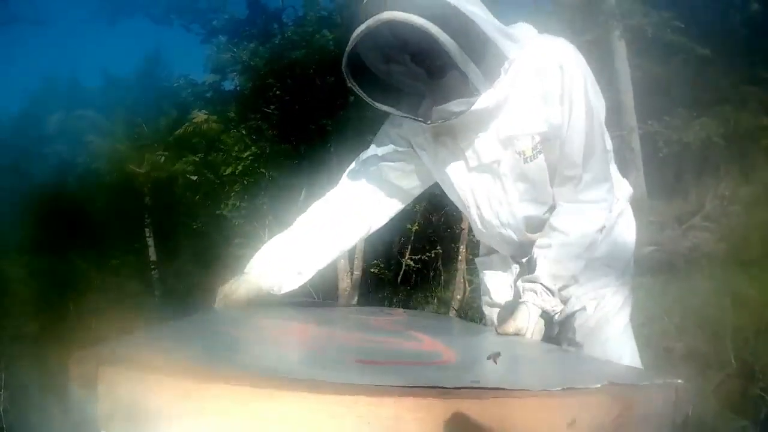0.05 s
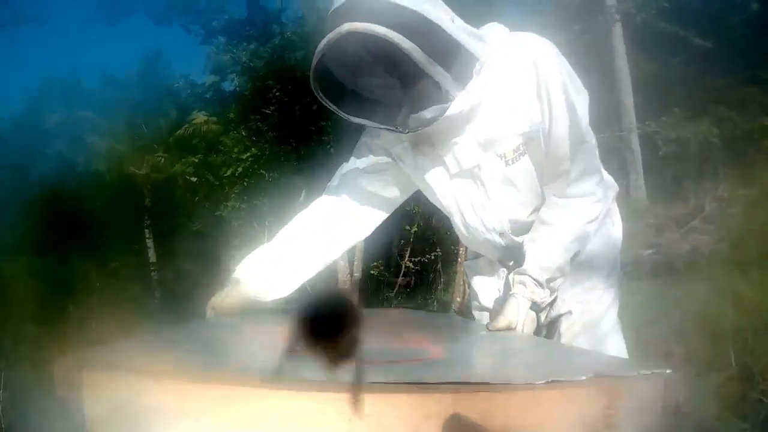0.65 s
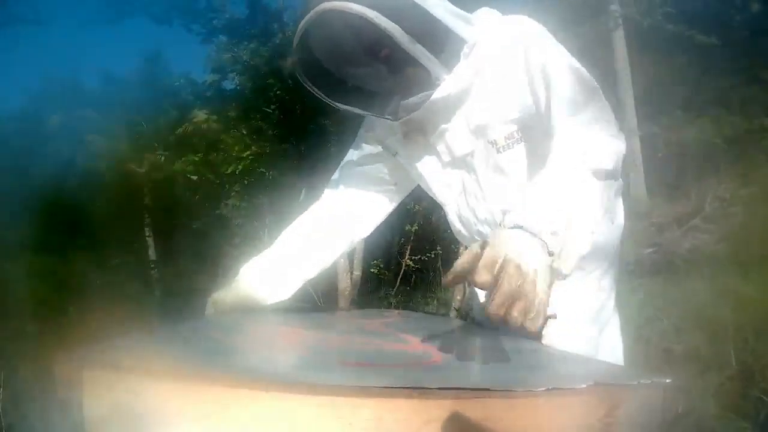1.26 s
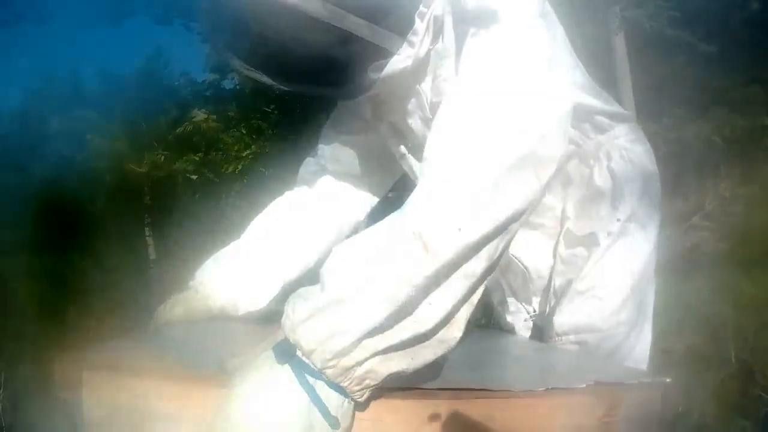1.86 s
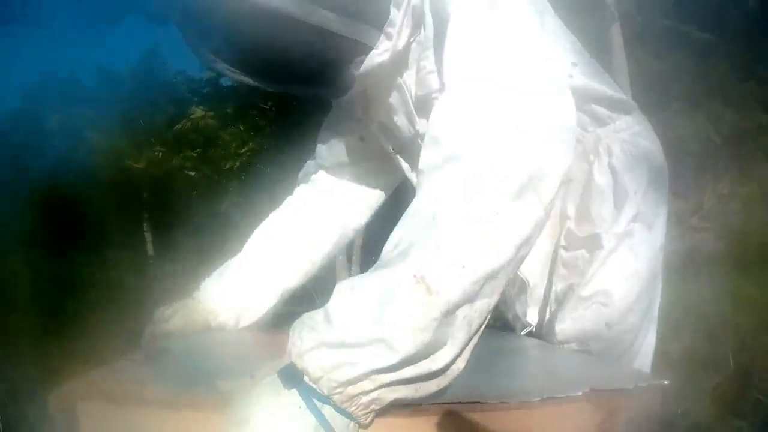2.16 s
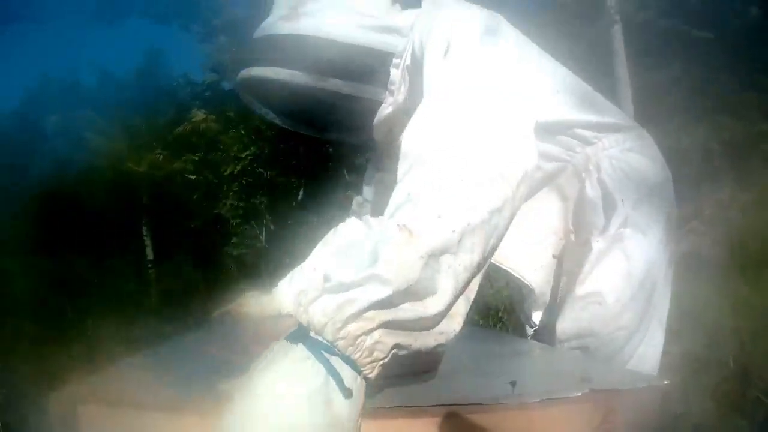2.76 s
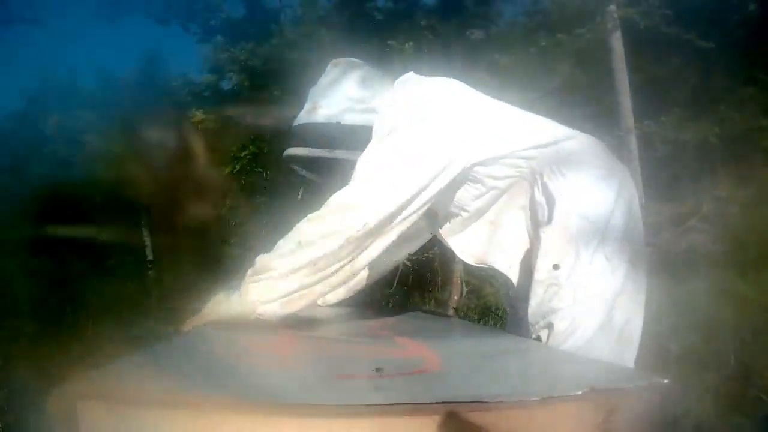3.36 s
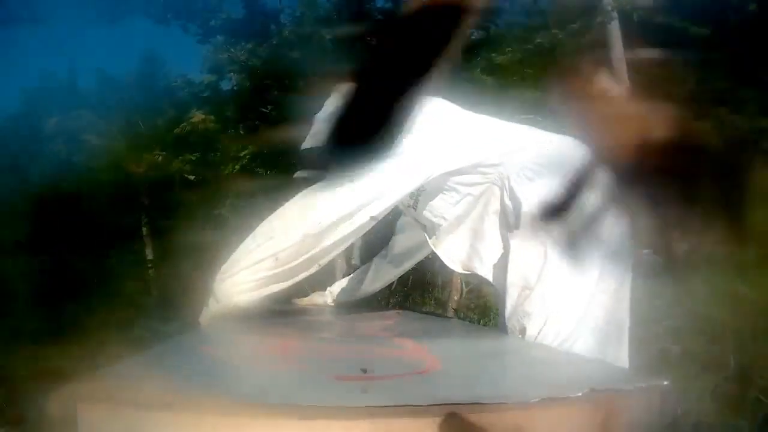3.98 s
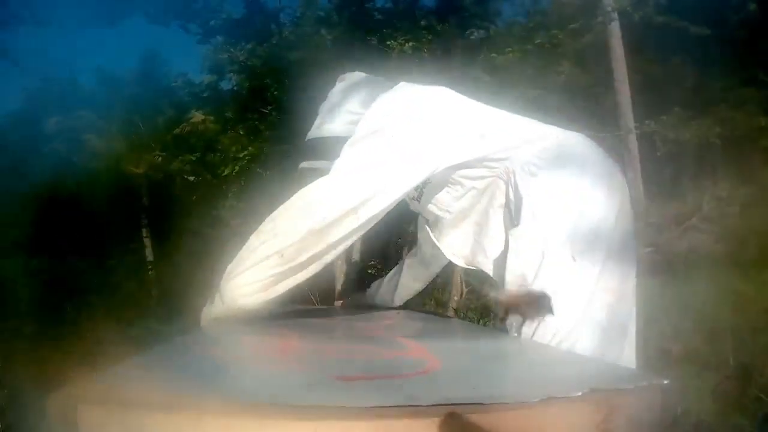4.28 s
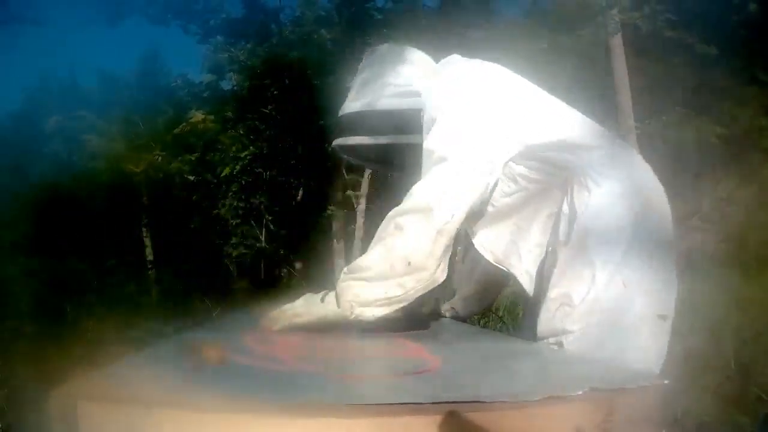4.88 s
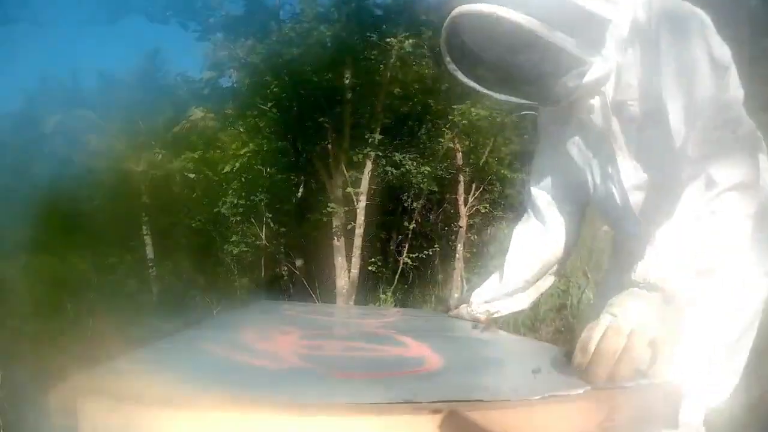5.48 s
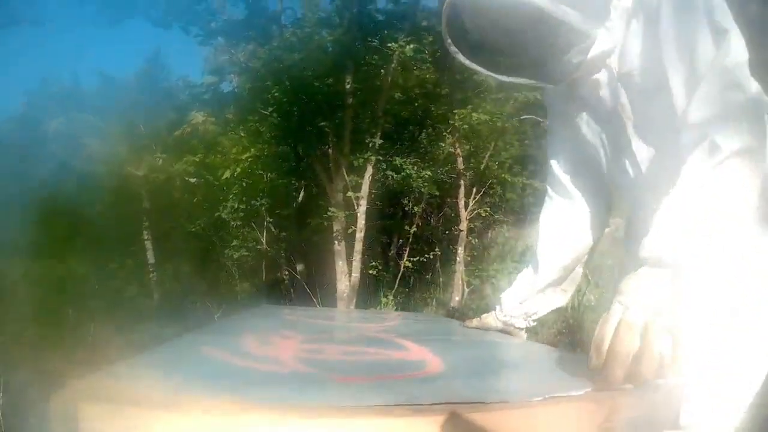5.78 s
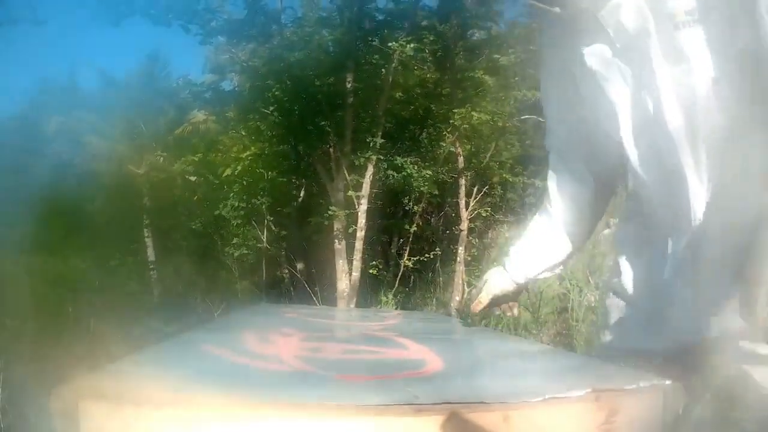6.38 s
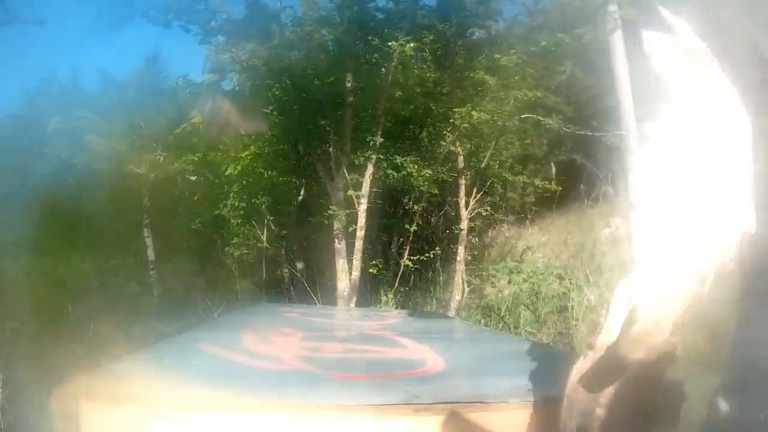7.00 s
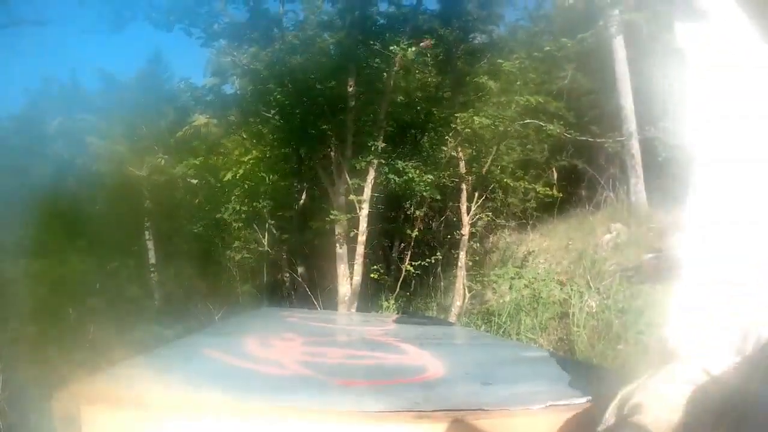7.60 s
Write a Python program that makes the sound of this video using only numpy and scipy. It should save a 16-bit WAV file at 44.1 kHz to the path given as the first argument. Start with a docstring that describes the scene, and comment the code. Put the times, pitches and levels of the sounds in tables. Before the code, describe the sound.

Honeybees drone steadily outdoors, and one after another they buzz quickly past a microphone standing on their wooden hive. Gloves rub the metal-covered lid and give it dull, rattling knocks. About two seconds in, the lid is bumped hard and shoved into place with a short juddering scrape. Close fly-bys then take over, with softer rubbing, a sharp click and a few light bumps. Everything sounds muffled.

```python
"""Gloves and sleeves rub and bump the metal-covered lid of a wooden hive, over a drone of honeybees.
The lid judders once as the beekeeper shoves it into place, ringing the box in stick-slip jerks.
Bee after bee swoops past a small camera standing on the box, each buzz a stack of wingbeat harmonics.
Every layer has the muffled tone of the camera's housing; the camera overloads on the shove and adds
a faint fizz."""
import sys
import numpy as np
from scipy import signal
from scipy.fft import rfft, irfft, next_fast_len
from scipy.io import wavfile
from scipy.ndimage import map_coordinates

SR = 44100
rng = np.random.default_rng(int(sys.argv[2]) if len(sys.argv) > 2 else 0)


def store_pcm(level_fs):
    """Save levels as 16-bit WAV."""
    pcm = np.round(np.clip(level_fs, -1, 1) * 32767).astype(np.int16)
    wavfile.write(sys.argv[1], SR, np.atleast_2d(pcm).T)


N = 341685
TIME = np.arange(N) / SR

# Levels in the tables are relative: each layer sets its own overall gain.
# open-air bed: (frequency [Hz], noise density [dB])
AIR_TONE = [(30, 5.5), (200, -3.5), (400, -1.5), (780, 2), (1100, -10.5), (2000, -27.5), (3500, -45),
            (6000, -38), (15000, -72)]
# the circling swarm: (time [s], mean wingbeat [Hz], level [dB])
SWARM_PATH = [(0, 273.6, -39.5), (.8, 275.5, -38), (1.2, 277.9, -40), (1.7, 286.3, -34.5),
              (2.4, 277.3, -32), (3, 276.7, -36), (3.6, 275.3, -33.5), (4.2, 268.3, -32),
              (4.75, 261.8, -40), (5.2, 262.5, -38), (5.8, 262.2, -37.5), (6.4, 261.1, -41),
              (6.85, 268.2, -44.5), (7.2, 271.2, -36.5), (7.75, 270.4, -39)]
# colour of the swarm: (frequency [Hz], level [dB])
SWARM_TONE = [(220, 0.5), (290, -6.5), (560, -1.5), (820, -8.5), (1000, -20), (1500, -25.5), (2300, -36.5),
              (3800, -47.5)]
# one bee's thin, high buzz: (time [s], wingbeat [Hz], level [dB])
WHINE_PATH = [(6.5, 430.4, -83), (6.7, 427, -53), (7.1, 426.1, -47), (7.4, 420.6, -44),
              (7.75, 427.1, -46.5)]
# gloved hands on the lid: (start [s], length [s], rubbing level [dB], rocking level [dB])
HAND_MOVES = [(0.035, 0.1, -35.5, -29), (0.208, 0.32, -34, -30.5), (0.556, .16, -32.5, -29.5),
              (1.258, .36, -46.5, -34.5), (2.3, 0.19, -40.5, -35.5), (2.595, 0.18, -54, -42.5),
              (3.273, 0.35, -52, -41), (3.917, .35, -50, -42.5), (4.526, 0.038, -49, -35),
              (4.903, 0.12, -48, -32.5), (5.016, 0.1, -35.5, -36), (5.214, .13, -38.5, -37.5),
              (5.364, 0.1, -40, -29), (5.508, 0.038, -29, -32.5), (5.616, 0.059, -26.5, -31.5),
              (5.748, 0.14, -55, -41.5), (6.965, 0.11, -36.5, -32.5), (7.186, 0.14, -47.5, -33.5),
              (7.355, 0.18, -36, -32), (7.679, .07, -33.5, -38.5)]
# rumble of the rocking box: (frequency [Hz], noise density [dB])
RUMBLE_TONE = [(18, 0.5), (45, 3.5), (62, -3.5), (85, 0), (120, -8), (165, -9.5), (230, -15), (400, -70.5)]
# leather and cloth on the lid: (frequency [Hz], noise density [dB])
RUB_TONE = [(71, -32.5), (120, 2), (147, -7.5), (238, -12.5), (274, -4), (358, -7.5), (399, -5), (474, -8),
            (528, -4), (647, -8.5), (769, 0), (971, -19.5), (5000, -61), (6500, -88.5), (11000, -120)]
# clicks, scuffs and squeaks: (time [s], level [dB], centre [Hz], bandwidth [Hz], 60 dB decay [s])
TICKS = [(0.314, -48.5, 1800, 1800, 0.048), (.565, -47.5, 2140, 400, .05), (1.253, -50, 1500, 1210, 0.42),
         (3.426, -63, 3983, 1998, 0.15), (3.909, -55.5, 2948, 2500, 0.092), (5.259, -27, 1850, 710, 0.025),
         (5.26, -47.5, 5550, 2400, 0.022), (5.269, -42.5, 1970, 1400, 0.13), (5.29, -51.5, 2750, 300, 0.13),
         (5.271, -58.5, 5500, 2400, 0.14), (5.29, -32.5, 1120, 220, 0.16),
         (5.642, -45.5, 3000, 2500, 0.011), (6.984, -43, 1300, 1200, 0.056), (7.484, -52, 3750, 250, 0.089),
         (7.494, -54, 4330, 250, 0.08)]
# resonances of box and lid: (frequency [Hz], bandwidth [Hz], level [dB])
BOX_MODES = [(83.5, 55, -11), (152.4, 9.5, -7), (254, 50, -3), (333.6, 50, 4), (404, 28, 3.5),
             (454.6, 21.7, 6), (568, 18, 2), (646, 20, 3), (695.6, 29, 1), (716, 12.5, 5.5), (753, 17, 0.5),
             (830, 100, -20), (1120, 97, -27), (1530, 44, -20), (1770, 200, -26), (2430, 300, -40)]
# dead thud of the boards: (frequency [Hz], level [dB])
THUD_TONE = [(20, 1.5), (60, 6), (400, 5), (780, 6), (1000, -0.5), (1500, -15), (2500, -39.5),
             (3800, -50.5), (8000, -58)]
# slow bending of the boards: (frequency [Hz], level [dB], 60 dB decay [s])
FLEX_MODES = [(84.3, -2.5, 0.31), (115, -1.5, 0.26), (160, 0, .14), (228.7, 0.5, 0.15), (316, -5, 0.16)]
# colour of a padded blow: (frequency [Hz], level [dB])
GLOVE_TONE = [(30, -14.5), (200, 4.5), (500, -0.5), (720, 2), (1000, 4), (1600, -4.5), (2500, 2.5),
              (3200, -13), (8000, -33.5)]
# blows on the box, and a soft thump at 4.184 s as a bee swoops close: (time [s], level [dB], thump offset [dB],
# 20 dB rattle decay [s])
KNOCKS = [(0.209, -17, -22, 0.026), (0.314, -34, 8.5, 0.025), (0.387, -14.5, -16, 0.13),
          (0.718, -10, -0.5, 0.046), (0.726, -4, -5, 0.065), (0.751, -11.5, -5.5, 0.086),
          (0.81, -21, 2, 0.094), (1.254, -14, -3, 0.059), (1.286, -21.5, 0, 0.2),
          (1.565, -23.5, -1.5, 0.061), (1.855, -7.5, -2.5, 0.089), (1.906, -1, -2.5, 0.057),
          (2.194, -6, -9.5, 0.077), (2.423, -21.5, -10, 0.058), (4.184, -29.5, 7, 0.036),
          (5.536, -17.5, -16.5, 0.023), (5.619, -27, 8.5, .04), (5.644, -27, 3, 0.085),
          (6.517, -27.5, -17, 0.034), (6.984, -28, -1.5, 0.043)]
# steady push on the lid: (time [s], force [dB])
PUSH_FORCE = [(1.88, -24.5), (1.92, -12), (2.08, -12), (2.26, -21), (2.38, -42)]
# the lid breaks loose in jerks: (time [s], force above the steady push [dB])
JERKS = [(1.961, 7.5), (2.026, 8.5), (2.058, 9), (2.104, 10.5), (2.154, 7.5)]
# grit under the lid: (frequency [Hz], noise density [dB])
GRIT_TONE = [(300, -31), (1300, -3), (1900, 2.5), (2700, 3), (3900, -18), (5500, -7.5), (7000, -9.5),
             (9000, -27.5), (15000, -36.5)]
# wing wash on the microphone: (time [s], level [dB], width [s])
WING_WASH = (4.208, -15, 0.0092)
# colour of a close bee: (frequency [Hz], level [dB])
CLOSE_BEE_TONE = [(220, 2), (290, -4), (560, 1), (750, -8.5), (830, -14.5), (1000, -12), (1350, -27.5),
                  (1600, -30), (1950, -37.5), (2500, -45.5), (3600, -66)]
# fly-bys: (closest at [s], level [dB], wingbeat [Hz], steepest glide [Hz/s], half length [s],
# fundamental offset from the bee's heading [dB])
FLYBYS = [(1.05, -44, 250, -150, .07, 5), (1.532, -36, 295.6, -1, .09, -13),
          (1.731, -33.5, 278.5, -61, 0.0692, -11.5), (2.338, -31, 287.8, 40, 0.0487, -1.5),
          (2.559, -34.5, 271.6, 60, 0.0713, -3.5), (2.841, -41.5, 279.5, 2, .05, 0.5),
          (3.131, -35.5, 294.4, 0.5, 0.041, 0.5), (3.36, -35.5, 284.8, 0, 0.08, 1.5),
          (3.674, -38.5, 296, 61, 0.06076, -2.5), (3.89, -34, 279, -100, 0.0303, 4.5),
          (3.929, -33, 253.2, 98.5, .03, 1), (4.01, -28, 270.6, -230, .045, 4),
          (4.101, -30, 243.2, -180, .04, 0.5), (4.186, -21, 285.7, 329.5, .022, -0.5),
          (4.281, -37.5, 273.6, -100, .05, 4), (4.49, -28, 245, 99.5, .028, 0),
          (4.574, -27, 271.7, -40, 0.0605, 3), (5.05, -38, 258.3, -1, 0.023, -2),
          (5.22, -34.5, 273.5, -0.5, .04, 2.5), (5.3, -43.5, 258, -200, .03, 1),
          (5.361, -32, 238.5, -39.5, 0.0497, 0.5), (5.56, -30, 252, 60, 0.0304, -8),
          (5.68, -22, 241.1, -330, .022, -5.5), (5.77, -28, 238.8, 129.5, .04, -2.5),
          (5.864, -36, 233.6, -130, 0.022, 2.5), (6.085, -30.5, 242, -210, .04, 0),
          (6.23, -33, 251.6, -130, 0.046, -4.5), (6.329, -33.5, 239.2, -180, .04, -5.5),
          (6.702, -46, 246, 60, 0.1187, 2.5), (7.172, -38.5, 253.7, 1.5, 0.038, 3),
          (7.432, -37, 285.3, -2.5, 0.054, 0)]


def amp(db):
    """Decibels to gain."""
    return 10 ** (np.asarray(db) / 20)


def unit(x):
    """Scale to rms 1."""
    return x / np.sqrt(np.mean(x ** 2) + 1e-20)


def eq_gain(tone, hz):
    """Gain of an EQ curve at hz, read on a log frequency axis."""
    freqs, db = np.transpose(tone)
    return amp(np.interp(np.log(hz + 1), np.log(freqs + 1), db))


def automation(rows):
    """One value per sample for each column after the time."""
    times, *columns = np.transpose(rows)
    return [np.interp(TIME, times, column) for column in columns]


def gate(rows, fade_s=0.069):
    """1 within the time span of the rows, fading to 0 outside."""
    return np.clip(1 + np.minimum(TIME - rows[0][0], rows[-1][0] - TIME) / fade_s, 0, 1)


def wobble(rate, size=N):
    """Smooth random modulation, rate knots a second."""
    t = TIME[:size]
    knots = rng.standard_normal(int(size * rate / SR) + 5)
    coarse = map_coordinates(knots, [1 + t[::32] * rate], mode="nearest")
    return np.interp(t, t[::32], coarse)


def filtered(x, response):
    """Shape x by a function of frequency."""
    size = next_fast_len(N + SR // 2)
    return irfft(rfft(x, size) * response(np.fft.rfftfreq(size, 1 / SR)), size)[:N]


def noise(tone):
    """Coloured noise of rms 1."""
    return unit(filtered(rng.standard_normal(N), lambda hz: eq_gain(tone, hz)))


def impulse(tone, size=4096):
    """The tightest (minimum-phase) impulse response with this colour, energy 1."""
    cepstrum = irfft(np.log(eq_gain(tone, np.fft.rfftfreq(size, 1 / SR))))
    cepstrum[1:size // 2] *= 2
    cepstrum[size // 2 + 1:] = 0
    response = irfft(np.exp(rfft(cepstrum)))
    return response / np.linalg.norm(response)


def slips(rate, spread_db):
    """Tiny stick-slip impulses of uneven size, about rate a second, rms 1."""
    clicks = (rng.random(N) < rate / SR) * rng.choice([-1, 1], N)
    return unit(clicks * amp(spread_db * rng.standard_normal(N)))


def open_air(level_db=-42.5, drift_db=2.07):
    """A soft bed of outdoor noise that drifts in level."""
    return amp(level_db + drift_db * wobble(3.165)) * noise(AIR_TONE)


def swarm(spread=.05, swerve=.04, jitter=0.007925, passing_db=3, bees=12):
    """The drone: each bee has its own wingbeat, swerves in pitch and swells as it passes."""
    mean_hz, db = automation(SWARM_PATH)
    drone = np.zeros(N)
    for offset in np.linspace(-1, 1, bees):
        beat_hz = mean_hz * (1 + spread * offset + swerve * wobble(7) + jitter * wobble(50))
        cycles = np.cumsum(beat_hz) / SR + rng.random()
        drone += amp(passing_db * wobble(6)) * (cycles % 1 - .5)  # one sharp stroke per beat
    # the factor hz flattens the sawtooth's slope ahead of the EQ
    drone = filtered(drone, lambda hz: hz * eq_gain(SWARM_TONE, hz) * (hz > 150) / (1 + (hz / 4000) ** 8))
    return amp(db) * unit(drone)


def wings(hz, tone, turn_db, turn_rate, hum_db=0, rasp_db=0, rasp_hz=1150, harmonics=12):
    """Wingbeat harmonics, voiced relative to the second; each swells and fades as the bee turns."""
    size = len(hz)
    t, buzz = TIME[:size], np.zeros(size)
    phase = 2 * np.pi * np.cumsum(hz) / SR
    beat_hz, shelf_db = hz[::64], np.broadcast_to(rasp_db, size)[::64]
    for k in range(1, harmonics + 1):
        db = turn_db * wobble(turn_rate, size)[::64] + hum_db * (k == 1)
        db += shelf_db / (1 + (rasp_hz / (k * beat_hz)) ** 8)  # rasp is a high shelf
        gain = amp(db) * eq_gain(tone, k * beat_hz) / eq_gain(tone, 2 * beat_hz)
        buzz += np.interp(t, t[::64], gain) * np.sin(k * phase + 2 * np.pi * rng.random())
    return np.sqrt(2) * buzz


def whining_bee(trim_db=-3.5, jitter=0.00634):
    """One bee beats its wings faster, a thin buzz above the swarm."""
    hz, db = automation(WHINE_PATH)
    tone = [(420, -6.5), (850, -9), (1300, -23.5)]  # (frequency [Hz], level [dB])
    buzz = wings(hz * (1 + jitter * wobble(25)), tone, turn_db=0.5, turn_rate=14, harmonics=3)
    return gate(WHINE_PATH) * amp(db + trim_db) * buzz


def hand_press(start, length, release_s, attack_s=0.017):
    """Envelope of a hand that presses down, holds and lets go."""
    attack = np.clip((TIME - start) / attack_s, 0, 1)
    return attack * np.exp(-np.maximum(TIME - start - length, 0) / release_s)


def lid_force(jerk_width_s=0.0098):
    """Force on the sliding lid: a steady push that surges at every jerk."""
    surges_db = sum(db * np.exp(-((TIME - at) / jerk_width_s) ** 2 / 2) for at, db in JERKS)
    return gate(PUSH_FORCE) * amp(automation(PUSH_FORCE)[0] + surges_db)


def box_rocking(level_db=0.5, shove_db=-7, resting_db=-47.5, sway_db=2):
    """Low rumble: the box shifts under the hands and the shove, and shakes the camera."""
    moves = [amp(db) * hand_press(at, length, release_s=.06) for at, length, _, db in HAND_MOVES]
    weight = np.max(moves, axis=0)
    shaking = np.sqrt(weight ** 2 + (amp(shove_db) * lid_force()) ** 2 + amp(resting_db) ** 2)
    return amp(level_db + sway_db * wobble(18)) * shaking * noise(RUMBLE_TONE)


def ticks():
    """Brief bright contacts, each a burst of noise in one resonance."""
    track, t = np.zeros(N + SR), np.arange(SR // 4) / SR
    hz = np.fft.rfftfreq(len(t), 1 / SR)
    for at, db, centre, width, t60 in TICKS:
        resonance = 1 / (1 + (2 * (hz - centre) / width) ** 2)
        burst = irfft(rfft(rng.standard_normal(len(t))) * resonance, len(t))
        rise = 1 - np.exp(-t * width)  # a narrow resonance builds slowly
        track[round(at * SR):][:len(t)] += amp(db - 60 * t / t60) * rise * unit(burst)
    return track[:N]


def glove_rubbing(level_db=0.5, catch_db=2.5):
    """Leather and cloth catch and slip on the lid."""
    grain = unit(signal.fftconvolve(slips(1300, spread_db=3.5), impulse(RUB_TONE))[:N])
    moves = [amp(db) * hand_press(at, length, release_s=0.065) for at, length, db, _ in HAND_MOVES]
    return amp(level_db + catch_db * wobble(30)) * np.max(moves, axis=0) * grain


def box_body(force, thud_db=-3):
    """A force rings the box's modes on top of the dead thud of the boards."""
    t = np.arange(SR // 2) / SR
    ring = sum((-1) ** k * amp(db) * width * np.exp(-np.pi * width * t) * np.sin(2 * np.pi * hz * t)
               for k, (hz, width, db) in enumerate(BOX_MODES))
    body = ring / np.linalg.norm(ring)
    thud = impulse(THUD_TONE)
    body[:len(thud)] += amp(thud_db) * thud
    return signal.fftconvolve(force, body / np.linalg.norm(body))[:N]


def glove_knocks(body_db=10, rattle_db=-17, flex_db=-5, flex_attack_s=0.00053):
    """Each padded blow bends the boards, and the loose lid rattles after it."""
    force, bending = np.zeros(N), np.zeros(N)
    chatter = slips(900, spread_db=1.5)
    t = np.arange(SR // 3) / SR
    attack = (1 - np.exp(-t / flex_attack_s)) ** 2
    for at, db, thump_db, rattle_s in KNOCKS:
        start = round(at * SR)
        tail = slice(start, start + len(t))
        force[start] += amp(db)
        force[tail] += amp(db + rattle_db - 20 * t / rattle_s) * chatter[tail]
        thump = sum(amp(mode_db - 60 * t / t60) * np.sin(2 * np.pi * (hz * t + rng.random()))
                    for hz, mode_db, t60 in FLEX_MODES)
        bending[tail] += amp(db + thump_db + flex_db) * thump * attack
    pad = impulse(GLOVE_TONE)
    padded_force = signal.fftconvolve(force, pad / np.abs(rfft(pad)).max())[:N]
    return amp(body_db) * box_body(padded_force) + bending


def lid_grit(level_db=-27, bite=1.75):
    """Grit under the sliding lid rasps when the force is high."""
    grit = unit(signal.fftconvolve(slips(3700, spread_db=5), impulse(GRIT_TONE))[:N])
    return amp(level_db) * lid_force() ** bite * grit


def lid_shove():
    """The lid grinds over the box in a few hard surges."""
    return box_body(lid_force() * slips(4000, spread_db=2.0))


def wing_wash():
    """One slow swing of air pressure as a bee brushes the microphone."""
    at, db, width = WING_WASH
    u = (TIME - at) / width
    return amp(db) * (4 * u ** 2 - 1) * np.exp(-2 * u ** 2)


def passing_bees(level_db=-3.0, jitter=0.0051, rasp=0.23, rasp_from_db=-31.5, fade_reach=2.48,
                 glide_reach=2.2, chaser_db=-8.0, chaser_swerve=.045, chaser_duck=0.38):
    """Each bee swells with 1 / distance, glides in pitch and turns raspy as it nears; another chases it."""
    pass_s = .8
    size = int(pass_s * SR)
    t, track = TIME[:size] - pass_s / 2, np.zeros(N + 2 * size)
    edges = signal.windows.tukey(size)
    for at, db, hz, glide, half_s, hum_db in FLYBYS:
        position = t / half_s  # in half lengths from the closest point, as are the reaches
        fade = edges * np.exp(-(position / fade_reach) ** 2)  # the bee melts into the swarm
        gain = amp(db) * fade / np.sqrt(1 + position ** 2)
        near_db = np.maximum(20 * np.log10(gain + 1e-9) - rasp_from_db, -10)
        beat_hz = hz + glide * half_s * glide_reach * np.tanh(position / glide_reach)
        bee_hz = beat_hz * (1 + jitter * wobble(78.7, size))
        bee = wings(bee_hz, CLOSE_BEE_TONE, turn_db=3.5, turn_rate=27.5, hum_db=hum_db,
                    rasp_db=rasp * near_db)
        chaser_hz = beat_hz * (1 + chaser_swerve * wobble(9, size))
        chaser = wings(chaser_hz, CLOSE_BEE_TONE, turn_db=0.5, turn_rate=18, hum_db=hum_db, harmonics=8)
        pair = bee + amp(chaser_db - chaser_duck * near_db) * chaser
        track[round((at + pass_s / 2) * SR):][:size] += gain * pair
    return amp(level_db) * track[size:size + N]


def scene():
    """Mono mix of the open air, the handled hive and the bees."""
    air = open_air()
    hive = glove_rubbing() + glove_knocks() + lid_shove() + lid_grit() + box_rocking() + ticks()
    bees = passing_bees() + swarm() + whining_bee() + wing_wash()
    return (air + hive + bees)[None]


def record(dry, ceiling=1.02, clock_hz=8000, first_image_db=-40.5, second_image_db=-53, top_hz=15750):
    """The camera overloads, and its coarse sampling mirrors the sound into a faint treble fizz."""
    squashed = dry[0] / (1 + np.abs(dry[0] / ceiling) ** 10) ** (1 / 10)
    mids = filtered(squashed, lambda hz: (hz / 750) ** 2 / (1 + (hz / 1700) ** 3))
    clock = 2 * np.pi * clock_hz * TIME
    fizz = 2 * mids * (amp(first_image_db) * np.cos(clock) + amp(second_image_db) * np.cos(2 * clock))
    return filtered(squashed + fizz, lambda hz: hz < top_hz)[None]


dry = scene()
out = record(dry)
store_pcm(out)
```